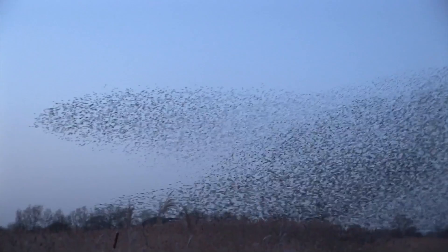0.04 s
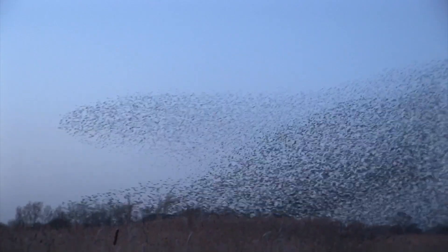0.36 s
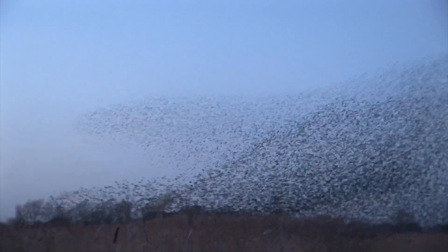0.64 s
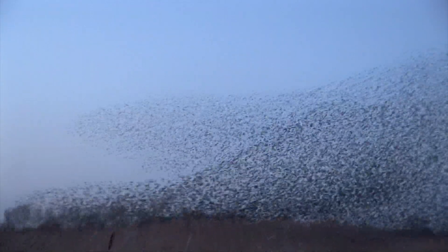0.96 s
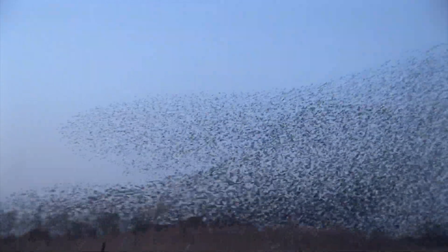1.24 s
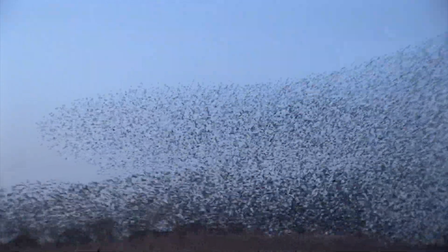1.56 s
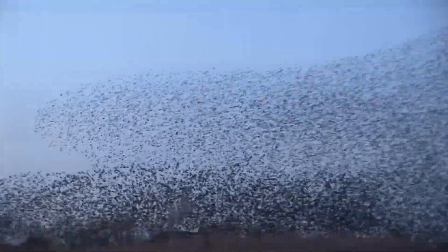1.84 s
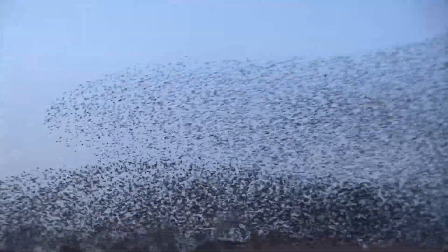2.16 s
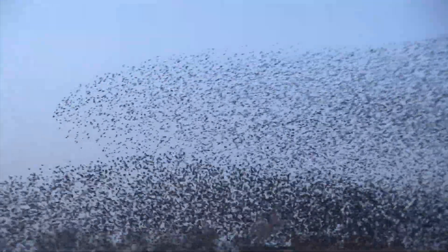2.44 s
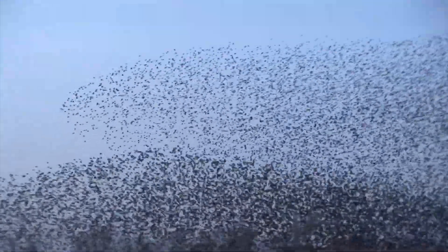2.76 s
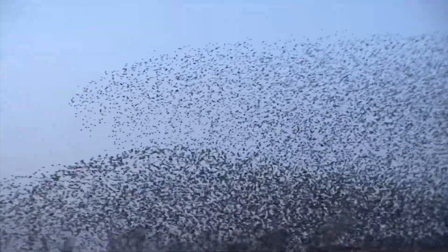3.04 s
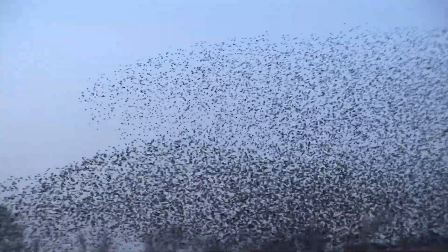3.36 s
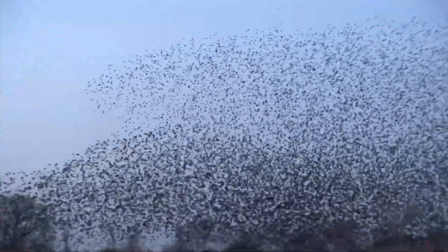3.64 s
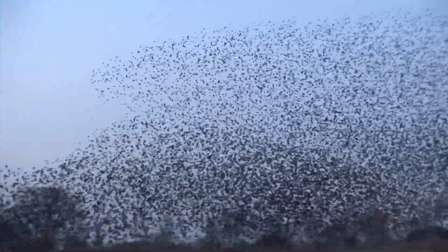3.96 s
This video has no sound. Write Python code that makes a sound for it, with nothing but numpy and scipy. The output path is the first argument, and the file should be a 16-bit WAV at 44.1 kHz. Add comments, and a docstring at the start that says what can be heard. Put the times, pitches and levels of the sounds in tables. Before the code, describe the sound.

A huge flock of birds rushes past on fluttering wings, with one brief cackle.

```python
"""From the start, a huge flock of starlings streams over a marsh: thousands of wingbeats push the air
and merge into a fluttering rush, with faint ticks like feathers touching. Under it lie a low outdoor
rumble and a slowly throbbing drone, like a distant aircraft with two propellers slightly out of step.
Halfway through, a nearer water bird gives one quick four-note cackle. The rest carries on to the end."""
import sys
import numpy as np
from scipy import signal
from scipy.fft import rfft, irfft
from scipy.io import wavfile
from scipy.ndimage import uniform_filter1d

SR = 44100
rng = np.random.default_rng(int(sys.argv[2]) if len(sys.argv) > 2 else 0)


def put_to_file(sound):
    """Save the sound as 16-bit audio at rate SR, in the file named by the first command-line argument."""
    columns = np.atleast_2d(sound).T  # one column per channel
    safe = np.clip(columns, -1, 1)
    whole_steps = np.round(safe * 32767)
    wavfile.write(sys.argv[1], SR, whole_steps.astype(np.int16))


N = 176400
T = np.arange(N) / SR


def amp(db):
    """Turns decibels into a number to multiply a sound by."""
    return 10 ** (np.asarray(db) / 20)


def unit(x):
    """Scales a signal to an average strength (rms) of 1."""
    return x / np.sqrt(np.mean(x ** 2) + 1e-20)


def at_hz(points, hz):
    """Looks up a table at the frequencies hz, on a scale of octaves."""
    f, value = np.transpose(points)
    return np.interp(np.log(hz + 1), np.log(f + 1), value)


def at_time(points, t):
    """Looks up a table at the times t."""
    return np.interp(t, *np.transpose(points))


def noise(spectrum):
    """Noise of strength 1, coloured by a table of frequencies and levels."""
    gain = amp(at_hz(spectrum, np.fft.rfftfreq(N, 1 / SR)))
    return unit(irfft(rfft(rng.standard_normal(N)) * gain, N))


def drift(hz):
    """A random wobble of strength 1, up to about hz times a second."""
    gain = np.exp(-(np.fft.rfftfreq(N, 1 / SR) / hz) ** 2)
    return unit(irfft(rfft(rng.standard_normal(N)) * gain, N))


def ears(middle, side):
    """Makes left and right from a shared part and a part that adds width."""
    return np.array([middle + side, middle - side])


def wingbeats(t, hz, birds=60, beats_per_s=7.7, pass_s=0.11, swish_octaves=0.51, near_share=0.03):
    """Flutter by pitch and time: each nearer bird swishes once per downstroke as it passes."""
    when, pitch, phase = rng.random((birds, 3)).T[:, :, None]
    rate = beats_per_s * np.exp(0.058 * rng.standard_normal((birds, 1)))
    strokes = np.exp(22 * np.cos(2 * np.pi * (rate * t + phase)))  # one sharp peak per beat
    passing = np.exp(-((t - when * (T[-1] + 1) + .5) / pass_s) ** 2)
    swish_hz = 800 * 8 ** pitch
    swish = np.exp(-(np.log2((hz + 1) / swish_hz) / swish_octaves) ** 2) + 0.0085
    near = swish.T @ (strokes * passing)
    average = uniform_filter1d(near, size=160, axis=1)
    return np.sqrt(1 - near_share + near_share * near / average)  # the far birds stay steady


def flock(hiss_hz=12700, patch_db=0.75):
    """Air rushes through countless wings, fluttering at a steady level under a wavering high hiss."""
    # colour of the rush shared by both ears: f/Hz, relative level/dB
    middle_colour = [(240, -22), (400, -2), (542, -5.5), (723, -8), (1060, -6), (1300, -10), (1570, -12),
                     (1900, -5.5), (2190, -.5), (2390, 0.5), (2790, -5), (3240, -12.5), (3770, -15.5),
                     (4100, -19), (4450, -24.5), (4750, -19.5), (4950, -17), (5200, -24), (5650, -25.5),
                     (6150, -35.5), (9000, -34), (13700, -33.5), (15000, -38)]
    # colour of the rush spread to the sides: f/Hz, relative level/dB
    side_colour = [(240, -42), (400, 2), (680, 0), (1010, 0), (1140, -4), (1570, -5), (2000, -6),
                   (2470, -14), (3150, -41), (3550, -9), (3830, -9), (4260, -6), (4880, -11), (5600, -4),
                   (7030, -22), (13700, -25.5), (15000, -28)]
    # slow curve that turns the highest hiss down as it rises: t/s, cut/dB before scaling
    hiss_cut = [(0, -6), (.35, -3), (.55, -1.3), (.8, -2.6), (1.1, -1.3), (1.3, 0), (1.5, 0), (2.2, .2),
                (2.55, 0), (2.85, 2), (3.15, -1), (3.45, .2), (3.65, .8), (4, 0)]
    # how strongly that curve turns the hiss down, heard only in the highest treble: f/Hz, factor
    cut_depth = [(500, .1), (1300, 0.15), (2300, 2.8), (3500, 1), (7000, 0.39)]
    # rise and fall of the highest hiss: t/s, level/dB
    hiss = [(0, -.5), (.45, 2), (.7, -0.5), (1.65, -1.2), (2.05, 5.5), (2.3, 1), (2.7, 2), (3.1, -1.5),
            (3.45, 2.5), (3.75, 1), (3.95, 5.5)]
    # how much louder the left is than the right: f/Hz, level/dB
    lean = [(60, 4), (99, 0.0), (160, -0.5), (270, -18), (450, 3), (740, -0.5), (1220, 4), (2010, 4),
            (3320, -2), (5490, 2), (9060, -0.5), (15000, -2.5)]
    rush = ears(amp(-40) * noise(middle_colour), amp(-48) * noise(side_colour))
    hz, t, bands = signal.stft(rush, SR, nperseg=512, noverlap=384)  # split by pitch and time
    patches = rng.standard_normal((len(t), len(hz))).T  # random louder and softer spots
    patches = uniform_filter1d(patches, size=8, axis=0)
    patches = unit(uniform_filter1d(patches, size=14, axis=1))
    treble = np.clip((hz[:, None] / hiss_hz) ** 4, 0, 1)
    cut_db = at_hz(cut_depth, hz)[:, None] * at_time(hiss_cut, t)
    treble_db = treble * (at_time(hiss, t) - cut_db)
    bands = bands * wingbeats(t, hz) * amp(treble_db + patch_db * patches)
    bands *= amp(ears(0, at_hz(lean, hz) / 2))[:, :, None]
    return signal.istft(bands, SR, nperseg=512, noverlap=384)[1][:, :N]


def feather_ticks(per_s=60, fade_s=0.00083, level_db=-72):
    """Faint bright ticks, as of feathers clipping each other."""
    hits = (rng.random(N) < per_s / SR) * amp(2 * np.minimum(rng.exponential(1, N), 3))
    fades = signal.lfilter([1], [1, -np.exp(-1 / (fade_s * SR))], hits)
    bursts = fades * rng.standard_normal((2, N))
    keep_treble = signal.butter(1, 3000, "high", fs=SR, output="sos")
    return amp(level_db) * unit(signal.sosfilt(keep_treble, bursts))


def rumble():
    """A far, low rumble over the open marsh, nearly the same in both ears."""
    # colour of the rumble shared by both ears: f/Hz, relative level/dB
    middle_colour = [(10, -9.5), (25, -12), (40, -3.5), (65, 1), (90, 2), (120, -2.5), (165, -6),
                     (205, -12.5), (250, -14), (320, -16), (400, -26), (470, -30), (700, -75)]
    # colour of the rumble spread to the sides: f/Hz, relative level/dB
    side_colour = [(20, -16), (70, -19), (170, 9.5), (280, 6.5), (400, -9), (470, -9), (700, -47)]
    # slow swell of the rumble: t/s, level/dB
    swell = [(0, -2), (.7, -0.6), (1.5, 0), (2.2, -0.4), (3.25, 1), (3.6, 0.5), (4, -1.5)]
    return amp(at_time(swell, T)) * ears(amp(-30) * noise(middle_colour), amp(-52) * noise(side_colour))


def propellers(waver_db=.5, jitter_radians=0.19):
    """Two propellers slightly out of step throb; the long way through the air fades each tone."""
    # how often a blade passes, averaged over both propellers: t/s, f/Hz
    blade_rate = [(0, 98.1), (1, 97.4), (2.1, 96.9), (3, 96.4), (4, 96.2)]
    # gap between the two blade rates: t/s, f/Hz
    rate_gap = [(0, .662), (4, .732)]
    # tones at 1, 2 and 3 times the blade rate: level/dB, second propeller's strength, t/s of a dip
    tones = [(-30, 0.25, 0.57), (-33, 0.82, 0.65), (-49, 0.37, 0.75)]
    # slow fading: t/s, then relative level/dB of tones 1, 2 and 3
    fading = [(0, 0, -1.5, 9), (.3, 5, 4.5, 4), (.6, 1, -1.5, -5.5), (1.1, 1.5, 4, 2), (1.6, 2, 0, -4),
              (1.9, -3, -2.5, 6.5), (2.15, 1.5, -0.5, 5.5), (2.45, 3.5, 3, 7), (2.8, -0.5, 2.5, -3),
              (3.05, 5, -1.5, -22), (3.5, 0, -2.5, -5), (4, -2.5, 3, 5)]
    fade = np.transpose(fading)
    cycles = np.cumsum(at_time(blade_rate, T)) / SR
    lead = np.cumsum(at_time(rate_gap, T)) / SR  # cycles by which one propeller is ahead
    drone = np.zeros(N)
    for k, (db, second, dip_s) in enumerate(tones, 1):
        apart = np.exp(1j * np.pi * k * (lead - np.interp(dip_s, T, lead)))
        throb = apart - second / apart  # the two partly cancel at each dip
        phase = 2 * np.pi * (k * cycles + rng.random()) + jitter_radians * drift(5.5)
        tone = (throb * np.exp(1j * phase)).real
        fade_db = np.interp(T, fade[0], fade[k]) + waver_db * drift(1.6)
        drone += amp(db) * unit(tone * amp(fade_db))
    return drone


def yelp(length, db, top_hz, overtone_db, sag, slip, rough, rise_s=0.0088, fall_s=0.0087):
    """One nasal note: the pitch arches, then slips down through a range where the throat rings."""
    # how the throat boosts or weakens each pitch: f/Hz, level/dB
    throat = [(800, -1), (1000, -1.5), (1500, 5), (1680, 9.5), (1830, -7), (2000, -3.5), (3000, -15.5),
              (3600, -12), (4000, -17), (5000, -25), (6000, -36)]
    t = np.arange(0, length, 1 / SR)
    progress = t / length
    peak_at, slip_at, open_at = 0.428, 0.71, 0.32  # shares of the note's length
    ending = np.clip((progress - slip_at) / (1 - slip_at), 0, 1)
    jitter = 0.0066 * drift(300)[:len(t)]
    hz = top_hz * (1 - sag * (progress - peak_at) ** 2 - slip * ending + jitter)
    cycles = np.cumsum(hz) / SR
    opening = amp(overtone_db) * np.minimum(progress / open_at, 1)  # overtones follow the lowest tone
    tone = np.zeros(len(t))
    for k in range(1, 6):
        strength = amp(at_hz(throat, k * hz)) * (opening if k > 1 else 1)
        rasp = 1 + rough * drift(420)[:len(t)]
        tone += strength * rasp * np.cos(2 * np.pi * k * cycles)
    shape = np.minimum(t / rise_s, 1) * np.minimum((length - t) / fall_s, 1)
    return amp(db) * shape * tone


def cackle(echo_db=-16, echo_s=.3):
    """A water bird yelps four times, and the reeds scatter a faint echo."""
    # notes before the throat colours them: start t/s, length/s, level/dB, top f/Hz,
    # overtone boost/dB, depth of the pitch arch, closing slip as a share of the pitch, roughness 0-1
    notes = [(2.0435, 0.031, -24.5, 996, 0, 0.415, 0.022, 0.09),
             (2.0865, 0.031, -24.5, 1000, -5.5, 0.327, 0.11, 0.13),
             (2.129, 0.033, -27.5, 983, 0.5, 0.24, .06, 0.1),
             (2.181, 0.02, -35.5, 1001, 7, 0.13, 0.02, 0.17)]
    voice = np.zeros(N)
    for start_s, *settings in notes:
        note = yelp(*settings)
        start = round(start_s * SR)
        voice[start:start + len(note)] += note
    t = T[:SR // 2]
    tail = rng.standard_normal((2, len(t))) * amp(-60 * t / echo_s)
    echo = signal.fftconvolve(voice[None], tail / np.linalg.norm(tail[0]), axes=1)[:, :N]
    return voice + amp(echo_db) * echo


def from_left(sound, delay_samples=3):
    """Sound from the left reaches the right ear a moment later."""
    return np.array([sound[0], np.roll(sound[1], delay_samples)])


def scene():
    """The flock, the far rumble and drone, and the one call."""
    return flock() + feather_ticks() + from_left(rumble() + propellers()) + cackle()


def record(dry):
    """Cuts off the very highest treble, above 15100 Hz."""
    treble_cut = signal.firwin(511, 15100, window=("kaiser", 9), fs=SR)
    return signal.oaconvolve(dry, treble_cut[None], "same")


dry = scene()
out = record(dry)
put_to_file(out)
```